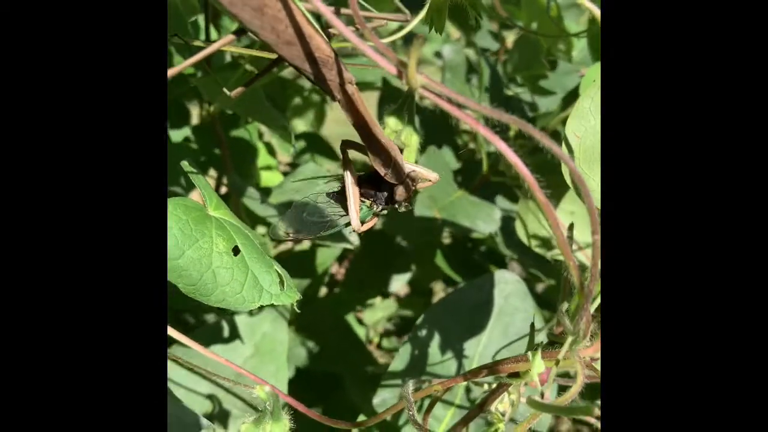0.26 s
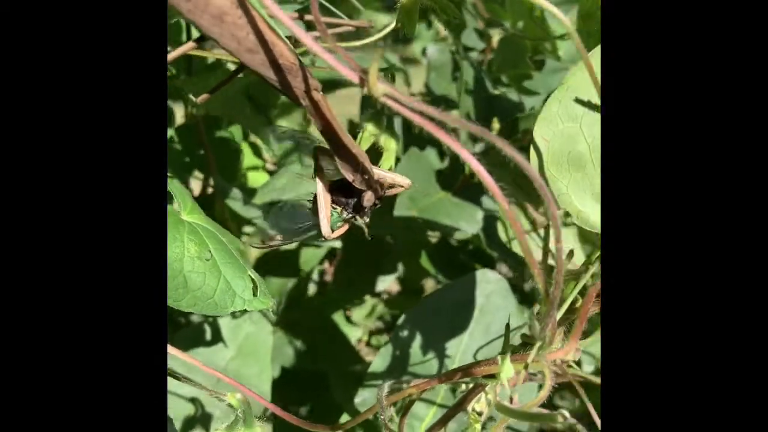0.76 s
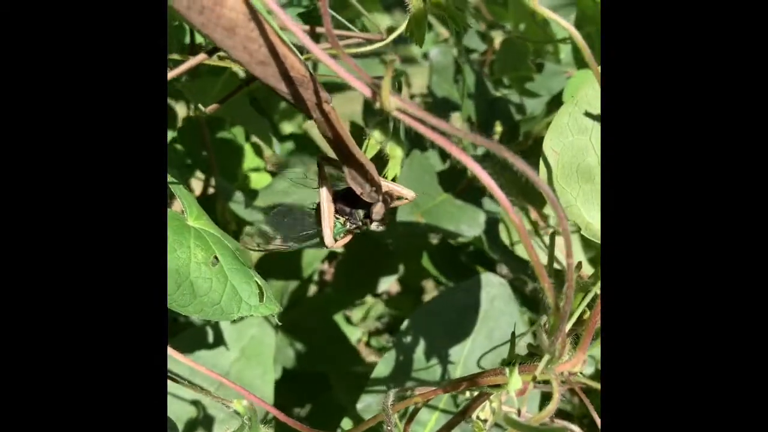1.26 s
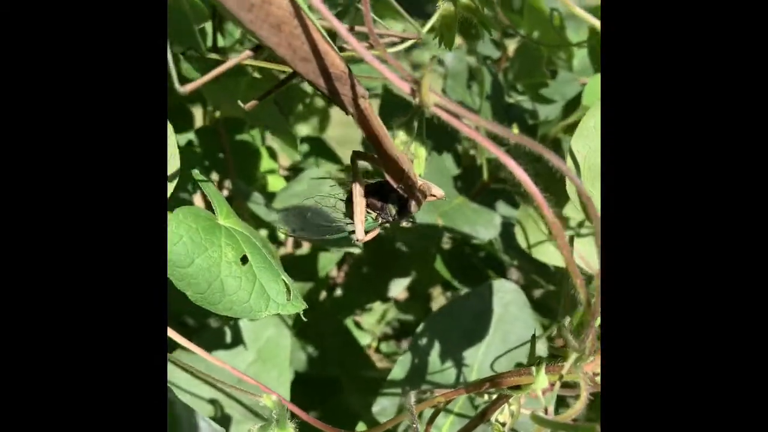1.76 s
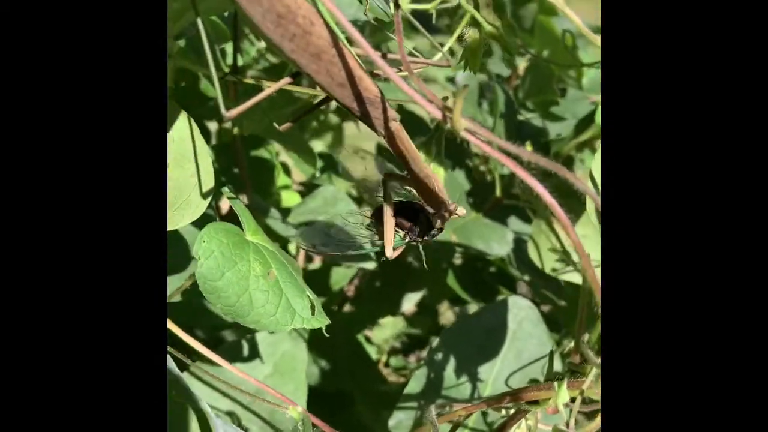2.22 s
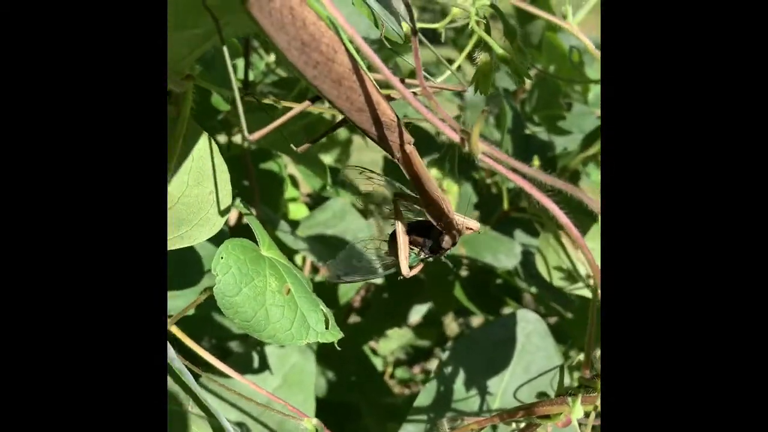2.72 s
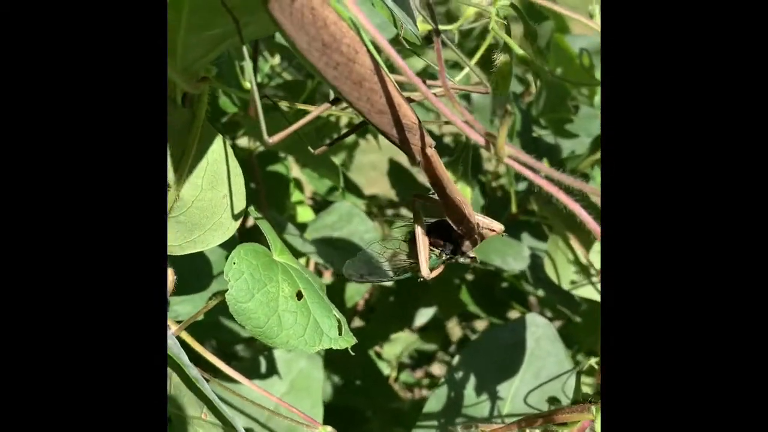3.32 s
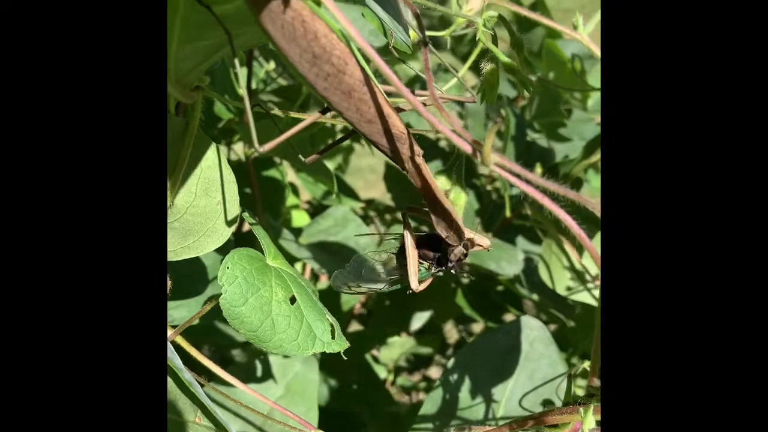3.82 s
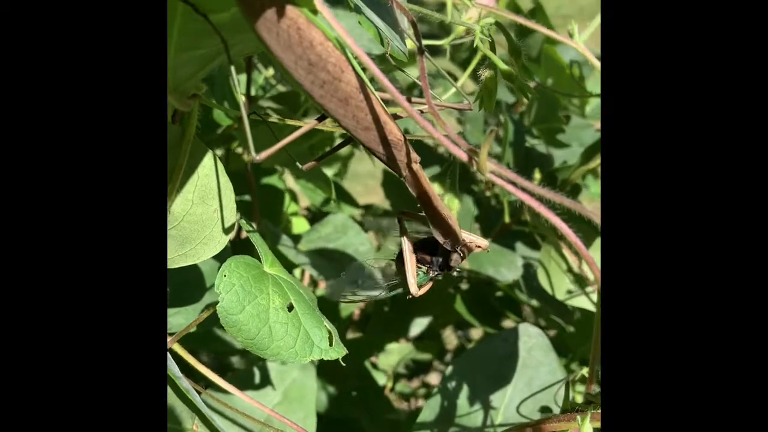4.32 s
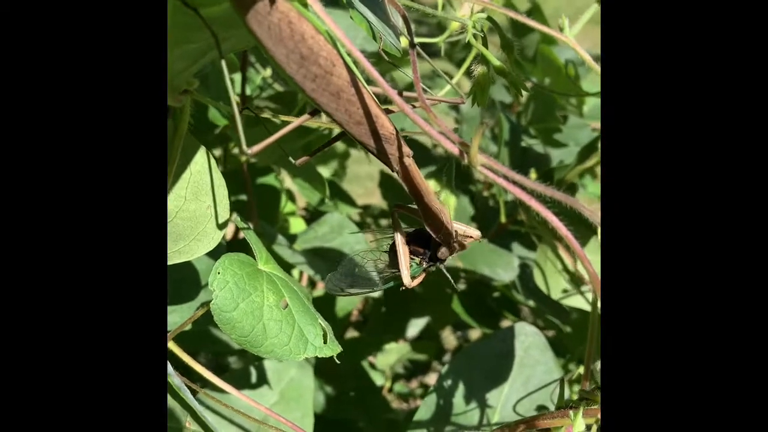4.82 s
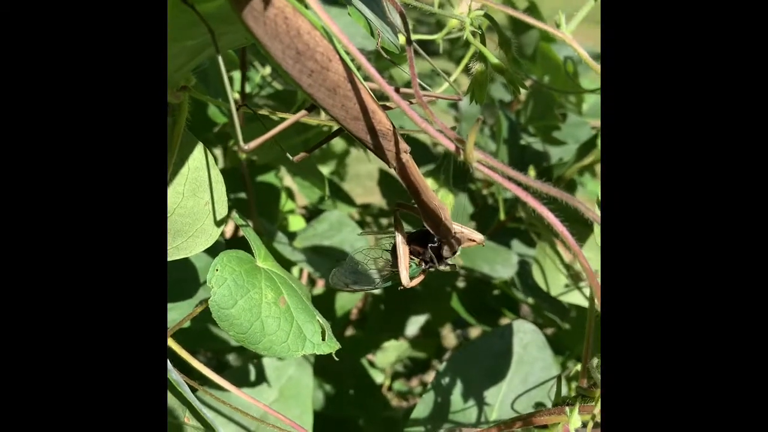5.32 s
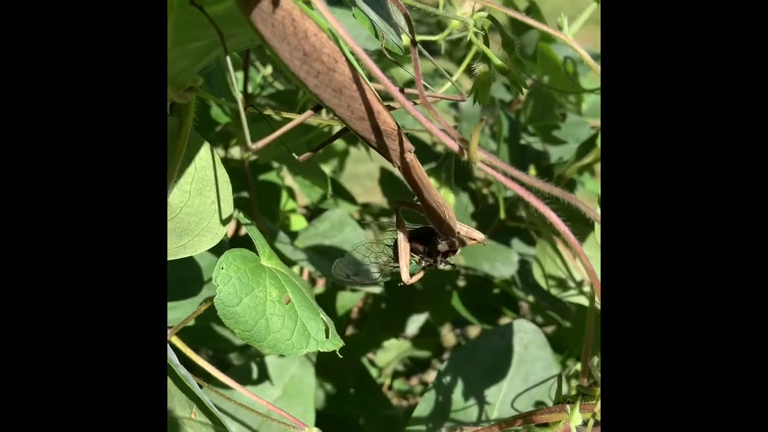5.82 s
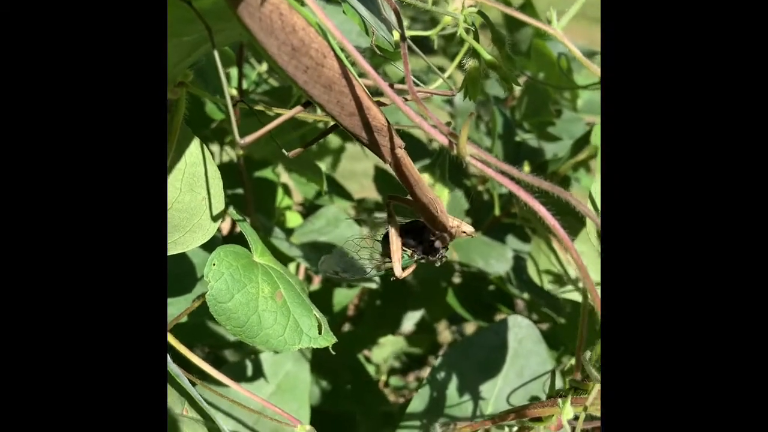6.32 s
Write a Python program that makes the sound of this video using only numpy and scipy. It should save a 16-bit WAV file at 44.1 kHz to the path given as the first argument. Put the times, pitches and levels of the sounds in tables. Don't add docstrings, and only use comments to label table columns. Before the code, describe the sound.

Close stereo pickup of crisp papery wing snaps with small scraping rustles, irregularly repeated and sparser toward the end. The background is a continuous bright insect chorus, fading slightly, with fast faint cricket pulses and a fine katydid buzz heard in three phrases. Low motor drone and airy rumble sit underneath, the engine wavering and weakening. Open garden, no echo.

```python
import sys
import numpy as np
from scipy import signal
from scipy.fft import rfft, irfft
from scipy.io import wavfile
from scipy.ndimage import uniform_filter1d

SR = 44100
rng = np.random.default_rng(int(sys.argv[2]) if len(sys.argv) > 2 else 0)


def wav_record(signal):
    frames = np.transpose(np.atleast_2d(signal))
    bounded = np.clip(frames, -1, 1)
    quanta = np.round(bounded * 32767).astype(np.int16)
    wavfile.write(sys.argv[1], SR, quanta)


def to_linear_factor(level_db):
    exponent = np.asarray(level_db, float) / 20
    return 10 ** exponent


N = 289737

# [f/Hz, level/dB]
CHORUS_LEVEL = [(0.0, -60), (0.51, -59), (1.0, -60.5), (3.5, -61.5), (4.59, -62.5), (6.57, -63)]
CHORUS_SPECTRUM = [(3800, -23), (4800, -9.5), (5300, -8.5), (5900, -10.5), (6800, 1.5), (7400, -5),
                   (8100, -6.5), (8500, -22), (9100, -43.5), (10500, -38.5), (12500, -40.5), (16000, -35)]
# [f/Hz, width/Hz, level/dB]
NEARER_VOICES = [(5630, 760, -6), (6980, 680, -7.5), (7670, 330, -4.5)]

# [t/s, cycle rate/Hz, drone level/dB, effort level/dB]
ENGINE_COURSE = [(0, 17.1, -40, -46), (.14, 17.9, -35, -46), (.5, 17.5, -34, -45), (.8, 17.5, -36.5, -44.5),
                 (.92, 17, -34.5, -51.5), (1.4, 17.4, -40.5, -50), (1.55, 16.7, -54.5, -52),
                 (1.75, 18.6, -43.5, -53), (2.05, 19.9, -42.5, -44), (2.43, 19.8, -41, -47.5),
                 (2.6, 19.3, -51, -53), (2.88, 20.3, -35.5, -52.5), (3.29, 20.6, -37.5, -51.5),
                 (3.46, 19.2, -52.5, -53), (3.63, 20.5, -44, -53), (4.3, 21.6, -50, -54.5),
                 (4.6, 20.4, -56.5, -57.5), (6.57, 20.7, -46.5, -53.5)]
# [order/1, level re effort/dB]
ENGINE_ORDERS = [(3, -15.5), (6, -9.5), (7, -7), (8, -5.5), (9, -13.5), (10, -14.5), (11, -17.5),
                 (12, -14.5)]
# [f/Hz, width/Hz, level/dB]
EXHAUST_MODES = [(138.4, 94, 0)]
PIPE_MODES = [(342, 35.7, 0.5), (409, 46, 0), (551, 90, -7)]
SILENCER_MODES = [(167.5, 13.6, 0)]

# [f/Hz, level/dB]
AIR_SPECTRUM = [(15, -63.5), (25, -16), (91, 3.5), (165, -18), (287, -19.5), (326, -28), (379, -19.5),
                (763, -27.5), (886, -29), (1010, -30), (4000, -48), (5200, -82), (8800, -120)]

# [start t/s, end t/s, level/dB, first stroke phase/cycles, strokes gained in the rush/1]
PHRASES = [
    (.075, 1.92, -59, .36, 2.6),
    (3.08, 4.8, -59, .27, 1.2),
    (5.89, 6.6, -60.5, .82, 2.0),
]
# [t/s, level/dB]
LONE_STROKES = [
    (2.487, -71),
    (5.312, -72),
]
# [f/Hz, level/dB]
KATYDID_SPECTRUM = [(10800, -39), (11800, -15.5), (12500, -16), (13200, -25), (13850, 2.5), (14500, 0),
                    (15200, 1), (15900, -9.5)]

# [downstroke snap t/s, snap peak level/dB, upstroke drag peak level/dB]
WING_BEATS = [(0.3002, -32, -44), (0.3426, -30, -47), (.6624, -31.5, -36), (0.7071, -31, -40),
              (.7513, -35.5, -42), (1.275, -32.5, -39), (1.3198, -32, -38.5), (1.6177, -30.5, -42),
              (1.6623, -32.5, -37), (1.7079, -36.4, -44.7), (2.136, -33, -46), (2.1787, -32, -47),
              (2.2211, -34, -44), (2.2656, -34, -41.5), (2.7165, -32, -47.9), (2.76, -31, -39),
              (3.0975, -32.5, -43), (3.1413, -33.9, -45), (3.1853, -32.5, -61), (3.5288, -33, -48),
              (4.3016, -36.5, -44), (4.3426, -33, -44), (4.9745, -32, -48), (5.017, -30.5, -45),
              (5.5852, -33, -46), (6.1019, -41.5, -52), (6.1432, -35.5, -45.5)]
# [t/s, peak level/dB, hollow body level re peak/dB]
HALF_BEATS = [(.258, -48.5, -5), (0.619, -46.5, -8), (1.2377, -35.5, -15), (1.382, -49, -22),
              (1.5776, -40.5, -12), (2.0555, -57.5, -18), (2.099, -46, -8), (2.211, -30, -31),
              (2.314, -55, -11), (2.677, -40, -18), (2.9133, -67, -12.4), (3.0572, -40.5, -11),
              (3.4835, -42, -14), (4.2594, -43.5, -19), (4.9381, -47, -4), (5.5472, -46.5, -6),
              (5.642, -58, -17), (5.8219, -61.5, -9.5), (6.059, -54.5, -1.2), (6.196, -62, -10),
              (.612, -59, -10), (1.572, -62, -18), (2.668, -70, -12), (3.571, -49, -18), (4.931, -63, -14)]
# [f/Hz, level/dB]
WING_SPECTRUM = [(600, -14), (2000, -25), (5000, -10), (7500, -12), (9500, -5), (11500, -7), (14000, -5),
                 (15500, -6.5), (17000, -14)]
STIR_SPECTRUM = [(300, -9), (700, 0.5), (1200, -4), (2000, -7), (3500, -4.5), (8000, -30.5)]
# [f/Hz, width/Hz, level/dB]
BODY_MODES = [(2430, 2300, -8.5), (3240, 870, -1), (4050, 600, 1.5), (4800, 230, -12)]
# [f/Hz, level/dB]
MEMBRANE_MODES = [(3900, -23.5), (5800, -23), (6600, -14.5), (7700, -9), (8500, -5), (9300, 5),
                  (10300, -10), (11300, -6.5), (12400, -6), (13800, 0), (15200, -16)]

# [f/Hz, level/dB]
PORT_LIKENESS = [(100, 0.99), (300, 0.9), (700, 0.13), (1800, 0.5), (3000, .2), (4500, 0.74), (16000, 1)]
LEFT_LEAD = [(0, 0), (1500, .3), (2600, 1.7), (3700, 1.6), (4700, 3.14), (15500, 18.85), (22050, 28.4)]
LEFT_TILT = [(150, 0), (350, -2), (800, -2), (1500, 0)]


def at_hz(points, hz):
    table_hz, value = np.array(points).T[:2]
    return np.interp(np.log(hz + 1), np.log(table_hz), value)


def rms_one(x):
    return x / np.sqrt(np.mean(x ** 2) + 1e-20)


def in_time(rows):
    s, *columns = np.transpose(rows)
    return [np.interp(np.arange(N) / SR, s, column) for column in columns]


def drift(rate_hz):
    r = np.exp(-16 * np.pi * rate_hz / SR)
    noise = rng.standard_normal(N // 8 + 8002)
    slow = signal.lfilter([1], [1, -2 * r, r * r], noise)[8000:]
    return np.interp(np.arange(N) / 8, np.arange(len(slow)), rms_one(slow - slow.mean()))


def resonate(x, modes):
    out = 0
    for k, (hz, width_hz, db) in enumerate(modes):
        r = np.exp(-np.pi * width_hz / SR)
        zeros = [(1 - r * r) / 2, 0, (r * r - 1) / 2]
        poles = [1, -2 * r * np.cos(2 * np.pi * hz / SR), r * r]
        out = out + (-1) ** k * to_linear_factor(db) * signal.lfilter(zeros, poles, x)
    return out


def colour(x, spectrum):
    cepstrum = irfft(np.log(to_linear_factor(at_hz(spectrum, np.linspace(0, SR / 2, 4097)))))
    cepstrum[1:4096] *= 2
    cepstrum[4097:] = 0
    response = irfft(np.exp(rfft(cepstrum)))[:4096]
    return signal.fftconvolve(x, response)[:N]


def ports(main, other):
    hz = np.linspace(0, SR / 2, N // 2 + 1)
    alike = np.clip(at_hz(PORT_LIKENESS, hz), 0, 1)
    half_lead = np.exp(.5j * np.interp(hz, *np.transpose(LEFT_LEAD)))
    turn = to_linear_factor(at_hz(LEFT_TILT, hz) / 2) * half_lead
    shared = np.sqrt(1 + alike) * rfft(main)
    unrelated = np.sqrt(1 - alike) * rfft(other)
    return irfft(np.array([(shared + unrelated) * turn, (shared - unrelated) / turn]), N) / np.sqrt(2)


def chorus():
    pair = []
    for port in range(2):
        hiss = rng.standard_normal(N) * to_linear_factor(1.77 * drift(85))
        pair.append(rms_one(colour(hiss, CHORUS_SPECTRUM)))
    for voice in NEARER_VOICES:
        throb_db = 2.9 * drift(25) + 3.1 * drift(2.0)
        pair[0] += to_linear_factor(6.5 + throb_db) * resonate(rng.standard_normal(N), [voice])
    return to_linear_factor(in_time(CHORUS_LEVEL)[0] + 2.0) * ports(*pair)


def engine():
    rate_hz, drone_db, effort_db = in_time(ENGINE_COURSE)
    turn = 2 * np.pi * np.cumsum(rate_hz) / SR
    fifth_db = drone_db + 2.8 * drift(2.5)
    fourth_db = effort_db - 0.5 + 4 * drift(9)
    out = np.sqrt(2) * (to_linear_factor(fifth_db) * np.sin(5 * turn) + to_linear_factor(fourth_db) * np.sin(4 * turn))
    for order, db in ENGINE_ORDERS:
        level_db = effort_db + db + 3.77 * drift(1.33)
        out += to_linear_factor(level_db) * np.sin(round(order) * turn + 1.45 * drift(1.46))

    def rough(modes):
        return rms_one(resonate(resonate(rng.standard_normal(N), modes), modes))

    pair = []
    for port in range(2):
        pipe_db = effort_db - 6 + 3.2 * drift(1.4)
        exhaust = to_linear_factor(effort_db - 4.0) * rough(EXHAUST_MODES)
        pair.append(exhaust + to_linear_factor(pipe_db - 4.0) * rough(PIPE_MODES))
    boom_db = -59 + 0.45 * (effort_db + 52)
    out += to_linear_factor(boom_db) * rough(SILENCER_MODES)
    return ports(out + pair[0], pair[1])


def air():
    fade_db_per_s = 0.13
    level_db = -47.5 - fade_db_per_s * (np.arange(N) / SR - 3) + .8 * drift(0.83)
    pair = [rms_one(colour(rng.standard_normal(N), AIR_SPECTRUM)) for port in range(2)]
    return to_linear_factor(level_db) * ports(*pair)


def cricket():
    start_s, period_s, chirp_s = .013, .1037, .017
    t = np.arange(N) / SR
    since = (t - start_s) % period_s
    chirp = np.sin(np.pi * np.clip(since / chirp_s, 0, 1)) * np.sin(2 * np.pi * 8015 * t)
    chirp = to_linear_factor(-57.5 + drift(2.6)) * chirp
    return ports(chirp, 0 * chirp)


def katydid():
    strokes_per_s, rush_s, tiring_per_s2 = 62.5, .7, .4
    soft_start_db, warm_up_s, fade_db_per_s = -3, .2, 1
    t, out = np.arange(N) / SR, np.zeros(N)
    uneven = to_linear_factor(3.8 * drift(56))
    for start, end, level_db, phase, rush in PHRASES:
        sung = np.maximum(t - start, 0)
        on = np.clip(np.minimum(t - start, end + 0.0025 - t) / 0.0045, 0, 1)
        gained = rush * (1 - np.exp(-sung / rush_s))
        count = phase + strokes_per_s * sung + gained - tiring_per_s2 * sung ** 2
        since = count % 1 / strokes_per_s
        effort_db = level_db + soft_start_db * np.exp(-sung / warm_up_s) - fade_db_per_s * sung
        tooth = uneven * to_linear_factor(-1 - since / 0.000087)
        echoes = to_linear_factor(-14.0 - 250 * since)
        out += on * to_linear_factor(effort_db) * (tooth + echoes)
    for s, level_db in LONE_STROKES:
        out += to_linear_factor(level_db) * np.sin(np.pi * np.clip((t - s) / 0.021, 0, 1))
    pair = [to_linear_factor(21.0) * colour(out * rng.standard_normal(N), KATYDID_SPECTRUM) for port in range(2)]
    return ports(*pair)


def strokes():
    s, snap_db, drag_db = np.transpose(WING_BEATS)
    last = np.diff(s, append=np.inf) > .1
    snaps = np.vstack([np.c_[s, snap_db, 0 * s - 8], HALF_BEATS])
    snap_t60 = 0.018 * to_linear_factor(-.18 * (snaps[:, 1] + 33.5))
    snap_rise = 0 * snap_t60 + .001

    upstroke_lead_s, fold_lag_s, fold_db, fold_t60_s = .0205, .023, -50, 0.081
    at = np.r_[s - upstroke_lead_s, s[last] + fold_lag_s]
    db = np.r_[drag_db, 0 * s[last] + fold_db]
    upstroke_t60 = np.minimum(0.04 * to_linear_factor(-0.4 * (drag_db + 46)), 0.061)
    drag_t60 = np.r_[upstroke_t60, 0 * s[last] + fold_t60_s]
    drag_body_db = -13.5 - 0.35 * (db + 46)
    drags = np.c_[at, db, drag_body_db, 0 * at + 0.0078, drag_t60]
    return np.vstack([np.c_[snaps, snap_rise, snap_t60], drags])


def wings():
    start, peak_db, body_db, rise, t60 = strokes().T[:, :, None]
    t = np.arange(3500) / SR
    decay = to_linear_factor(-60 * np.maximum(t - rise, 0) / t60)
    rustle = to_linear_factor(-36 - 300 * t)
    shape = np.minimum(t / rise, 1) ** 2 * (decay + rustle)
    at = np.round(start * SR).astype(int) + np.arange(3500)
    clumps = to_linear_factor(3.7 * drift(540))

    def crackle():
        grains = shape * rng.standard_normal(shape.shape) * clumps[at]
        grains *= to_linear_factor(2.76 * rng.exponential(1, shape.shape))
        energy_ratio = np.sum(shape ** 2, axis=1) / np.sum(grains ** 2, axis=1)
        return grains * np.sqrt(energy_ratio)[:, None]

    def place(grains, gain_db):
        return np.bincount(at.ravel(), (grains * to_linear_factor(gain_db)).ravel(), N) + 1e-18

    pair = []
    for port in range(2):
        membrane_noise = to_linear_factor(12.5) * colour(place(crackle(), peak_db), WING_SPECTRUM)
        hollow_body = to_linear_factor(12) * resonate(place(crackle(), peak_db + body_db), BODY_MODES)
        pair.append(membrane_noise + hollow_body)
    strike = crackle()
    strength_db = rng.normal(0, 3.5, (len(start), len(MEMBRANE_MODES)))
    for k, (hz, db) in enumerate(MEMBRANE_MODES):
        mode = [(hz, 450, 0)]
        struck = place(strike, peak_db + strength_db[:, [k]])
        pair[0] += to_linear_factor(db + 7.5) * resonate(resonate(struck, mode), mode)

    effort = uniform_filter1d(place(shape, .5 * peak_db) - 1e-18, size=900)
    stir = []
    for port in range(2):
        swish = rms_one(colour(rng.standard_normal(N), STIR_SPECTRUM))
        stir.append(to_linear_factor(-32.0) * effort * swish)
    return ports(pair[0] + stir[0], to_linear_factor(-5.5) * pair[1] + stir[1])


def scene():
    return chorus() + engine() + air() + cricket() + katydid() + wings()


def low_pass(x):
    return signal.sosfilt(signal.butter(12, 16980, fs=SR, output="sos"), x)


def record(dry):
    bass_cut = signal.butter(2, 38, "high", fs=SR, output="sos")
    top_cut = signal.cheby2(12, 32, 15900 * 1.015, fs=SR, output="sos")
    mix = signal.sosfilt(top_cut, signal.sosfilt(bass_cut, dry))
    return low_pass(mix)


dry = scene()
out = record(dry)
wav_record(out)
```